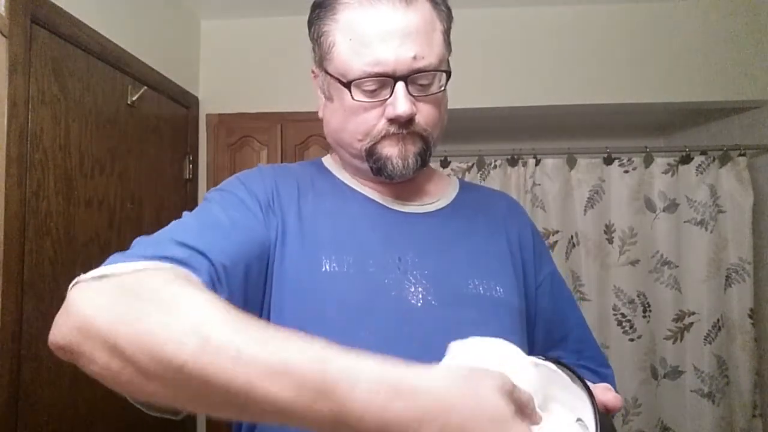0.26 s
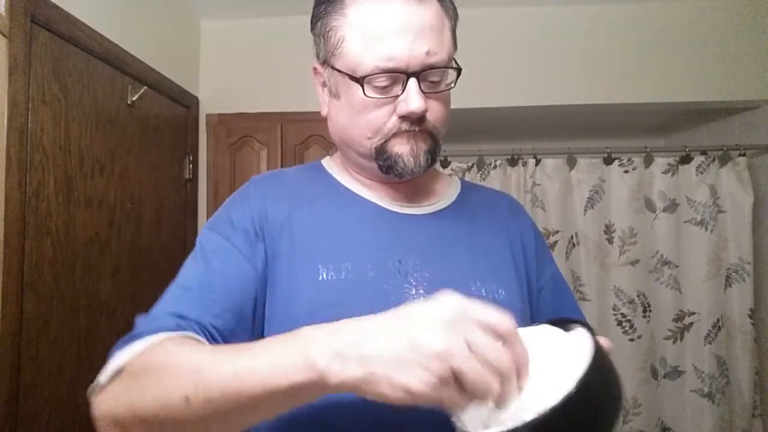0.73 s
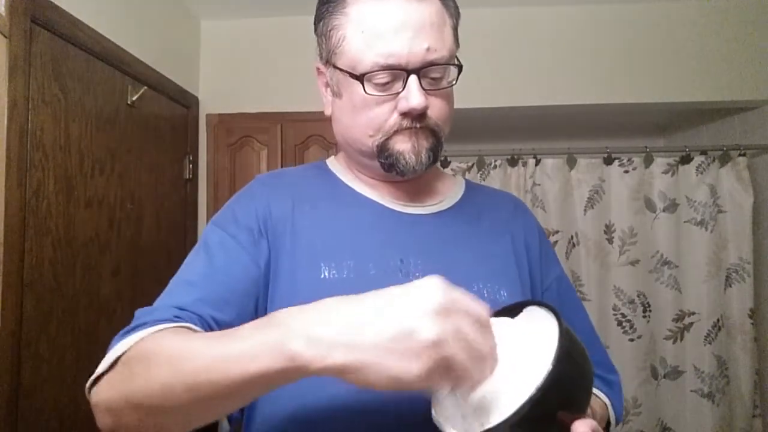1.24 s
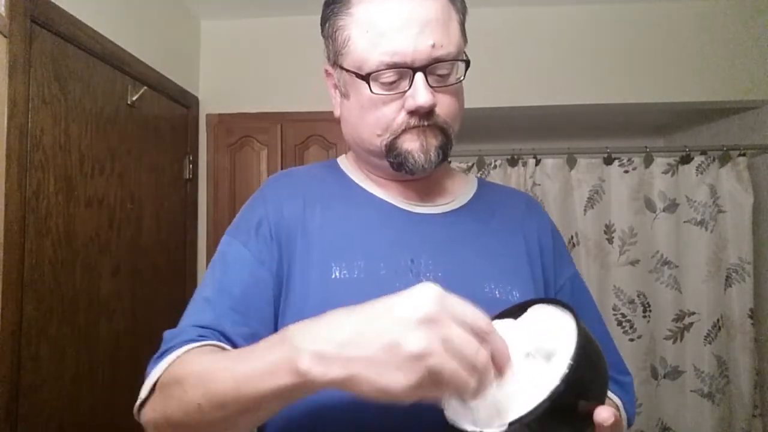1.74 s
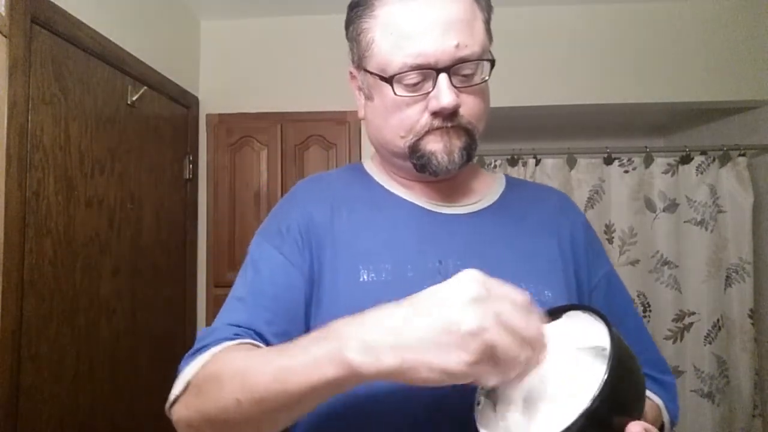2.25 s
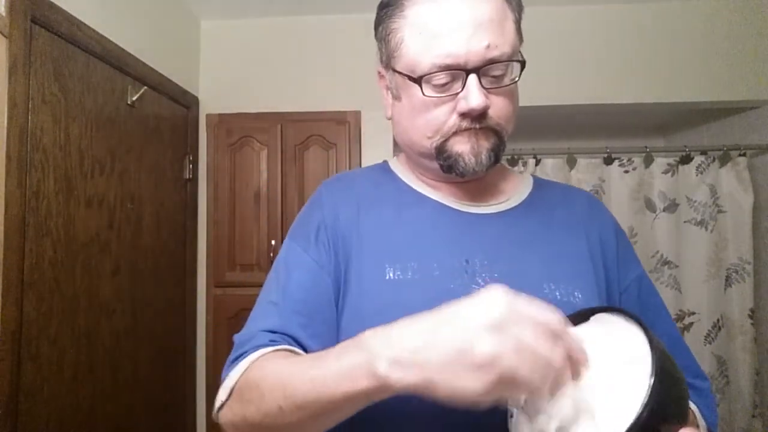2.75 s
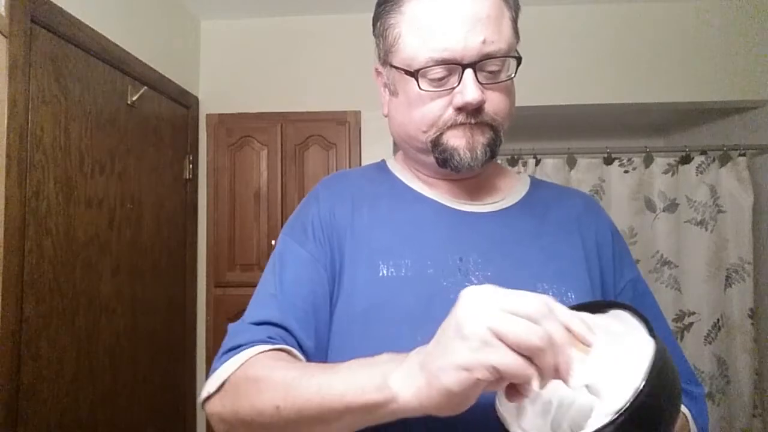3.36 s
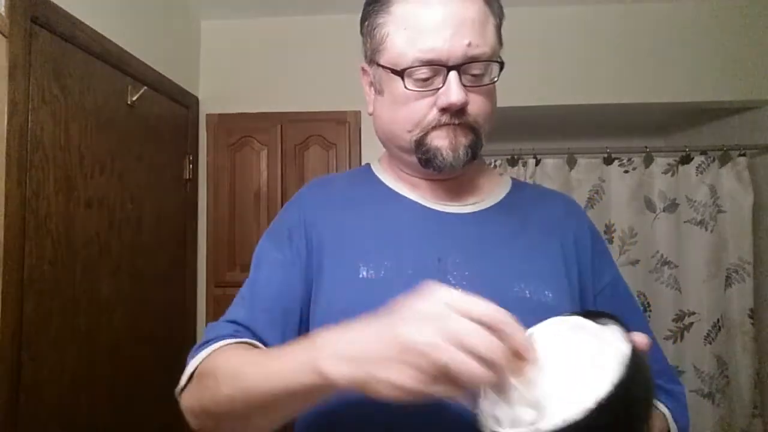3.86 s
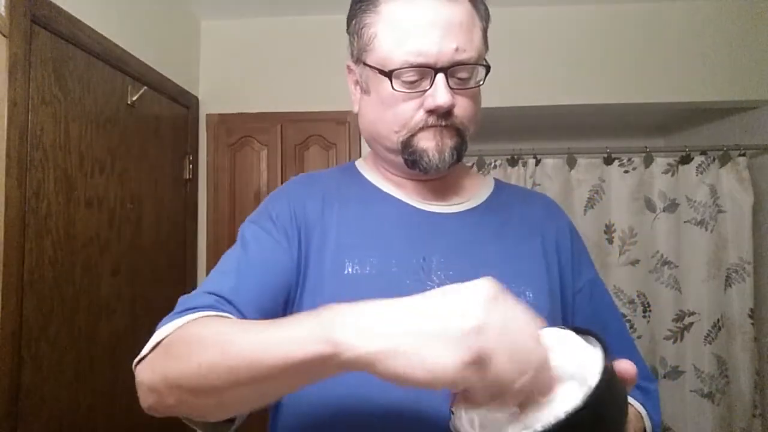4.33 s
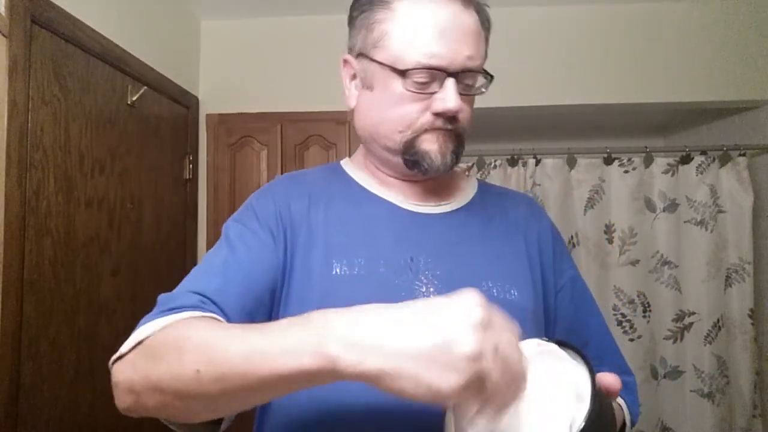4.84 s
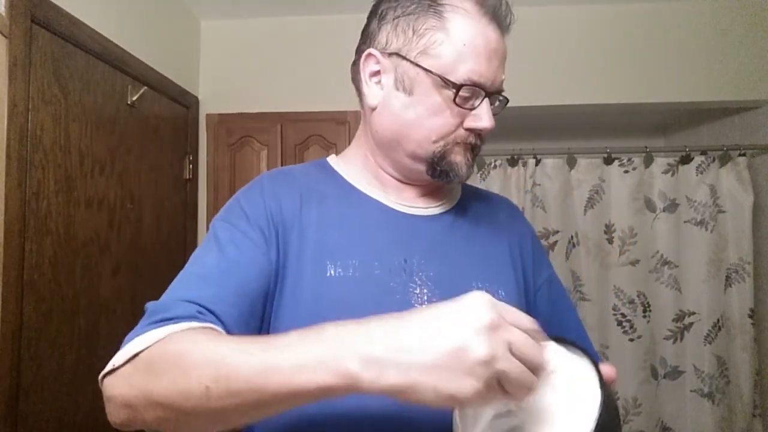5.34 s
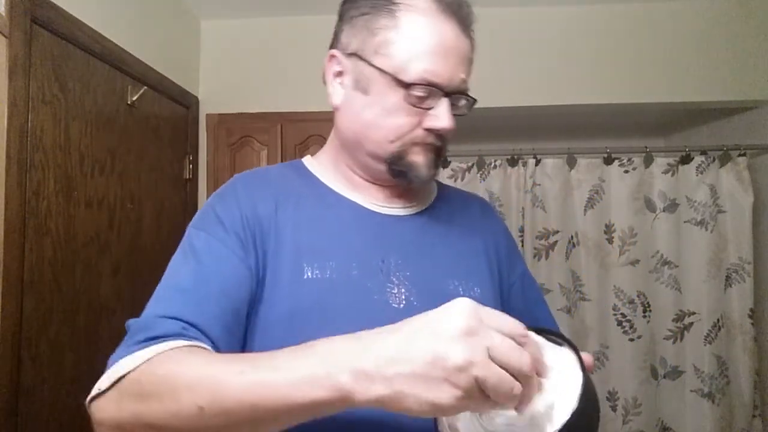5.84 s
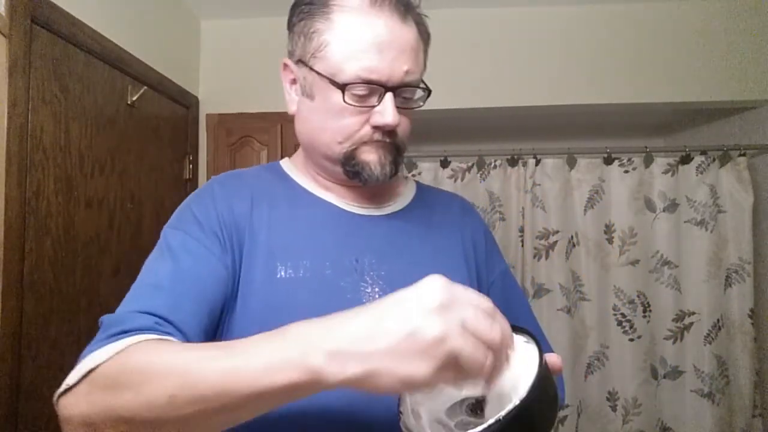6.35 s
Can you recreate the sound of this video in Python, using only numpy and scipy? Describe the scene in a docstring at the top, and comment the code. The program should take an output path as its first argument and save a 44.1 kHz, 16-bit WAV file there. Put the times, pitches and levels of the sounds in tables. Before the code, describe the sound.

A shaving brush kneads wet lather in a hand-held bowl, heard close in a small reflective bathroom. At 0 s soft squelching and faint crackle are under way, fading almost to nothing by 0.5 s. At about 0.65 s the brush returns with a dull bump and loud hollow plops, clustered until 1.25 s. Gentler whisking follows, with a wet burst of plops and crackle around 2.0-2.3 s, then easy strokes and a faint knock at 2.9 s. From 3.2 s it dies away; one small ringing plop sounds at 3.5 s in near quiet. Around 4.0-4.15 s squelching resumes with a light bump, growing busier, with a ringing plop at 5.1 s. From 5.3 to 6.6 s the strokes are strongest, thick with snaps, bubbles and a bump near 6.0 s. Dull rubbing, low hum, faint airy hiss and tiny very high whistles lie beneath.

```python
"""In a small live bathroom, a shaving brush whisks wet lather in a hand-held bowl.
Random bursts of bubbles make squelch and crackle; a faint, very high hiss of shaped noise comes and goes.
Pockets of air plop open as short rings with a snap and spray; wet bristles add faint gliding whistles.
Twice the whisking dies away and returns, as the brush is lifted and pushed back in.
Now and then the brush bumps the bowl; dull rubbing and a low room hum lie under it all."""
import sys
import numpy as np
from scipy import signal
from scipy.fft import rfft, irfft, next_fast_len
from scipy.io import wavfile
from scipy.ndimage import map_coordinates

SR = 44100
rng = np.random.default_rng(int(sys.argv[2]) if len(sys.argv) > 2 else 0)


def int16_out(signal):
    """Quantize to a 16-bit WAV file."""
    q = np.round(np.clip(np.atleast_2d(signal).T, -1, 1) * 32767)
    wavfile.write(sys.argv[1], SR, q.astype(np.int16))


N = 290619  # length in samples

# how hard the brush is worked: start_s [s], effort_db [dB]
EFFORT = [(0.0, -53.5), (0.37, -78), (0.64, -92.5), (0.84, -57.5), (1.56, -62), (1.82, -63.5), (2.13, -58),
          (2.81, -57), (2.99, -63), (3.27, -75), (3.98, -87), (4.13, -57), (4.66, -54.5), (5.12, -58.5),
          (5.51, -49), (6.06, -56), (6.18, -50), (6.59, -52)]
EASY_DB = -56.5  # the effort of easy, even whisking


def lather():
    """The brush kneads the foam: big bubbles squelch and small ones crackle, both in the same clumps."""
    # tone of the big and of the small bubbles: pitch_hz [Hz], level_db [relative dB]
    squelch_spectrum = [(88, -35), (150, -10), (210, -13), (308, -2.5), (482, -10.5), (550, -8),
                        (627, -3.5), (663, -4), (830, -9.5), (972, -5.5), (1040, -4.5), (1320, -20.5),
                        (1400, -8.5), (1820, -38), (3080, -120)]
    crackle_spectrum = [(530, -37.5), (900, -6), (1070, -5.5), (1320, -5), (1460, -7), (1710, -7),
                        (2320, -23), (2970, -23.5), (3720, -23.5), (4230, -32), (6160, -31.5), (7280, -35),
                        (8520, -50.5), (9500, -67.5), (12400, -95), (20900, -120)]
    squelch_easy_db, crackle_easy_db = -59, -65  # at easy effort, before clumping and echo
    squelch_grows, crackle_grows = 0.92, 1.23  # dB gained per dB of effort

    effort_db = effort_above_easy()
    swept_squelch, swept_crackle = sweeps()
    # steady whisking and firm sweeps add as powers
    squelch_gain = np.hypot(amp(squelch_easy_db + squelch_grows * effort_db), swept_squelch)
    crackle_gain = np.hypot(amp(crackle_easy_db + crackle_grows * effort_db), swept_crackle)

    clumps = np.tanh(wobble(70))  # between -1 and 1
    squelch_gain = squelch_gain * amp(4.3 * clumps - 3.0)
    crackle_gain = crackle_gain * amp(6.07 * clumps - 3.5)

    big = bubbles(rate=700, low_hz=200.0, high_hz=1440, cycles=3.8, spread_db=16)
    small = bubbles(rate=2600, low_hz=855, high_hz=7900, cycles=4.5, spread_db=13.0)
    squelch = foam(big, squelch_gain, squelch_spectrum, wet_db=-0.5)
    crackle = foam(small, crackle_gain, crackle_spectrum, wet_db=-1.5)
    return squelch + crackle


def effort_above_easy():
    """Brush effort over time, in dB above easy whisking."""
    return curves(EFFORT)[0] - EASY_DB


def sweeps():
    """Firm sweeps through the foam: each bites, eases off and lets go, giving squelch and crackle gains."""
    # levels at the bite, before clumping and echo:
    # start_s [s], length_s [s], squelch_db [dB], crackle_db [dB]
    sweep_table = [(-0.02, 0.12, -54.5, -76), (0.623, 0.013, -65, -59.5), (0.641, 0.17, -44.5, -60),
                   (1.103, 0.047, -60, -55.5), (1.816, 0.22, -55.5, -67), (1.988, 0.17, -49, -60),
                   (2.127, 0.053, -43, -54.5), (2.259, 0.13, -52.5, -56.5), (2.482, 0.15, -53.5, -59),
                   (2.622, 0.18, -54, -60), (2.997, 0.18, -58, -71.5), (3.939, 0.21, -55, -64),
                   (4.133, 0.05, -43, -54), (4.272, 0.091, -54.5, -69), (4.685, 0.086, -51, -55.5),
                   (4.804, .1, -71, -57), (5.303, 0.063, -50, -52.5), (5.43, 0.26, -61, -59.5),
                   (5.615, 0.065, -54, -61), (5.718, .06, -51.5, -65), (5.796, 0.063, -51.5, -65),
                   (6.01, 0.15, -45.5, -52), (6.257, 0.092, -40, -44), (6.51, 0.074, -47.5, -51),
                   (6.577, .03, -48, -45)]
    attack_s, sag_db, release_db_per_s = 0.0061, 5.5, 349
    gains, t = np.zeros((2, N)), np.arange(N) / SR
    for start_s, length_s, squelch_db, crackle_db in sweep_table:
        age = np.maximum(t - start_s, 0)
        bite = np.minimum(age / attack_s, 1)
        sag = sag_db * np.minimum(age / length_s, 1)
        release = release_db_per_s * np.maximum(age - length_s, 0)
        gains += amp([[squelch_db], [crackle_db]]) * bite * amp(-(sag + release))
    return gains


def bubbles(rate, low_hz, high_hz, cycles, spread_db):
    """Bubbles burst at random (rate a second), each ringing for a few cycles; most are faint. Rms 1."""
    when, pitch, size, phase = rng.random((int(rate * N / SR), 4)).T[:, :, None]
    hz = low_hz + (high_hz - low_hz) * pitch
    k = np.arange(int(cycles * SR / low_hz))  # samples since the burst
    age = hz * k / SR  # in cycles
    envelope = (1 - np.exp(-4 * age)) * amp(-50 * age / cycles)
    ring = np.sin(2 * np.pi * (age + phase)) * envelope
    loudness = np.sqrt(hz) * amp(spread_db * size ** 4)  # the root evens out energy across pitches
    grains = loudness * ring
    position = k + (when * N).astype(int)
    return unit(np.bincount(position.ravel(), grains.ravel(), N)[:N])


def foam(grains, gain, spectrum, wet_db):
    """Bubble grains coloured by the foam, played at a gain and heard in the room."""
    voiced = unit(coloured(grains[None], spectrum)[0])
    return bathroom(voiced * gain, wet_db, ring_db=-11.5)


def plops():
    """A film snaps and sprays; a moment later its air pocket rings and the shifted foam gives a low push."""
    # air pockets opening, levels before the boosts below and the filters:
    # start_s [s], cavity_db [dB], pitch_hz [Hz, where the ring settles],
    # push_db [dB], snap_db [dB], spray_db [dB]
    plop_table = [(0.116, -48, 547, -48, -68, -62), (0.266, -49, 526, -72, -65, -67.5),
                  (0.744, -26, 615, -51, -36.5, -57), (0.802, -32.5, 500, -48, -48.5, -65.5),
                  (0.933, -50, 635, -57, -58, -67.5), (0.997, -33, 663, -51.5, -48.5, -70),
                  (1.032, -32, 735, -47.5, -45, -67.5), (1.112, -44, 705, -55.5, -53, -78),
                  (1.242, -40.5, 563, -54.5, -52, -80), (2.01, -39, 810, -56.5, -64, -60.5),
                  (2.038, -37, 616, -59.5, -52, -60), (2.108, -31, 626, -51.5, -45, -70),
                  (2.139, -48, 716, -43, -50, -67), (2.158, -31.5, 614, -39.5, -34, -49.5),
                  (2.275, -45, 970, -57, -44.5, -73), (2.514, -45, 1000, -54, -53, -77),
                  (3.943, -53.5, 676, -56, -58.5, -78), (4.125, -41.5, 670, -53.5, -59, -71.5),
                  (4.137, -36, 640, -41.5, -47.5, -73), (4.56, -39.5, 605, -62, -47, -63),
                  (4.709, -39, 624, -56, -59, -58), (4.727, -35, 570, -48, -44.5, -55.5),
                  (4.81, -39.5, 680, -56, -58, -70), (4.9, -42, 633, -50.5, -50, -57),
                  (5.297, -43.5, 695, -61, -50.5, -60), (5.42, -43.5, 680, -58, -45.5, -73),
                  (5.463, -36, 654, -56, -49, -61.5), (5.633, -49, 388, -49.5, -46, -55),
                  (5.725, -47, 636, -49, -67, -79), (5.765, -36.5, 604, -53, -47, -58.5),
                  (5.98, -36, 645, -47.5, -50, -60), (6.038, -37, 530, -39, -39, -51.5),
                  (6.062, -47, 388, -53.5, -45, -78), (6.111, -42, 616, -45.5, -37, -59),
                  (6.13, -34, 650, -35, -57, -53.5), (6.257, -30, 638, -47, -43.5, -64),
                  (6.305, -24.5, 632, -46, -39, -50), (6.424, -33.5, 643, -57.5, -49, -65)]
    cavity_boost_db, push_boost_db, snap_boost_db, spray_boost_db = 7.5, 8, 13, 9.5
    out, t = np.zeros((3, N + SR)), np.arange(SR // 10) / SR
    torn = np.maximum(t - .0005, 0)  # seconds since the film tore
    opened = np.maximum(t - .0012, 0)  # seconds since the pocket opened
    for start_s, cavity_db, pitch_hz, push_db, snap_db, spray_db in plop_table:
        push_size, snap_size = 1 + .12 * rng.uniform(-1.44, 1, 2)  # random shifts of pitch
        cavity = damped(opened, pitch_hz, t60=0.014, attack=0.002, bend=0.36)
        cavity = amp(cavity_db + cavity_boost_db) * cavity
        push = damped(opened, 300 * push_size, t60=0.024, attack=0.0016)
        push = amp(push_db + push_boost_db) * push
        snap = damped(torn, 1330 * snap_size, t60=0.0071, attack=0.0019, bend=0.63)
        snap = amp(snap_db + snap_boost_db) * snap
        puff = amp(-60 * torn / 0.027) * (1 - np.exp(-torn / 0.00069))
        spray = amp(spray_db + spray_boost_db) * puff * rng.standard_normal(len(t))
        out[:, round(start_s * SR):][:, :len(t)] += np.array([cavity + push, snap, spray])
    # filter points: (Hz, dB)
    body = coloured(out[:1], [(60, 0.5), (200, -7.5), (900, 5), (1500, 10), (3000, -19.0), (8000, -40.5)])
    film = coloured(out[1:2], [(300, -6.5), (1000, 19.0), (1900, 7.0), (2400, -2.0), (8000, -16.0)])
    mist = coloured(out[2:], [(1000, -6), (2200, 5.5), (3700, 4.0), (4600, -7.0), (7200, -13.0),
                              (9000, -33.0), (15000, -21)])
    return bathroom((body + film + mist)[0], wet_db=-2.5, ring_db=-8)


def ringing_plops():
    """Two plops that ring on in the room: a small burst of noise and one short ring."""
    # level before echo: start_s [s], level_db [dB], pitch_hz [Hz]
    ringing_table = [(3.520, -44, 730), (5.133, -36.5, 797)]
    ring_t60_s, burst_t60_s = 0.041, .014
    burst_db = -4  # relative to the ring, before the burst's filter
    out, t = np.zeros((2, N + SR)), np.arange(SR // 4) / SR
    for start_s, level_db, pitch_hz in ringing_table:
        ring = damped(t, pitch_hz, ring_t60_s, attack=0.0022)
        burst = amp(burst_db - 60 * t / burst_t60_s) * rng.standard_normal(len(t))
        out[:, round(start_s * SR):][:, :len(t)] += amp(level_db) * np.array([ring, burst])
    bursts = coloured(out[1:], [(300, 1.5), (850, 20), (1400, 8.5), (2200, -10.5), (4000, -16), (9000, -41)])
    return bathroom(out[0, :N] + bursts[0], wet_db=4, ring_db=-12)


def knocks():
    """The loaded brush softly bumps the bowl: the hand-damped bowl thuds briefly and the lather slaps."""
    # bumps, levels before the filters: start_s [s], level_db [dB], slap_db [dB relative to the bump]
    knock_table = [(0.644, -15, -21.5), (0.699, -28.5, -30), (.996, -32.5, -25.5), (1.031, -30.5, -24),
                   (2.896, -37, -16.5), (4.161, -38.5, -14.5), (6.037, -27.5, -21)]
    # tones of the damped bowl: pitch_hz [Hz], level_db [dB before a small random change],
    # t60_s [s to fall by 60 dB]
    thud_tones = [(155.6, -25.5, 0.062), (258, -3, 0.014), (336, 0.5, 0.015), (478, -0.5, 0.016),
                  (669, -6, 0.02), (1370, -9, 0.0022)]
    out, t = np.zeros((2, N + SR)), np.arange(SR // 10) / SR
    for start_s, level_db, slap_db in knock_table:
        thud = np.zeros(len(t))
        for k, (pitch_hz, tone_db, t60_s) in enumerate(thud_tones):
            sign = (-1) ** k  # neighbouring tones start in opposite directions
            tone_gain = amp(tone_db + rng.normal(0, 1))
            thud += sign * tone_gain * damped(t, pitch_hz, t60_s, attack=0.00018)
        slap = amp(slap_db - 60 * t / 0.022) * rng.standard_normal(len(t))
        out[:, round(start_s * SR):][:, :len(t)] += amp(level_db) * np.array([thud, slap])
    body = coloured(out[:1], [(700, 2), (1500, 2), (4000, -12.5)])
    wet = coloured(out[1:], [(300, 5.5), (1700, 9), (2600, -9.5), (7000, -23.0), (9000, -32.5)])
    return bathroom((body + wet)[0], wet_db=-1, ring_db=-10.5)


def whistles():
    """Wet bristles whistle faintly and unsteadily, very high up: each tone swells, glides and fades."""
    # start_s [s], length_s [s], first_hz [Hz], last_hz [Hz], level_db [dB at the middle, before echo]
    whistle_table = [(-.5, 1.05, 13100, 12130, -83), (0.621, 0.52, 12260, 12060, -80),
                     (2.792, .07, 13300, 13200, -85), (3.0, .1, 13850, 13900, -85),
                     (3.01, .1, 15500, 15800, -87), (5.627, .1, 13800, 14200, -74),
                     (5.806, .12, 13200, 13450, -74), (5.781, .08, 15100, 15420, -77),
                     (5.862, 0.18, 14400, 14300, -84)]
    waver_hz, flutter_hz = 60, 150  # size of the slow and the fast random drift in pitch
    out, t = np.zeros(N), np.arange(N) / SR
    for start_s, length_s, first_hz, last_hz, level_db in whistle_table:
        progress = np.clip((t - start_s) / length_s, 0, 1)
        glide = first_hz + (last_hz - first_hz) * progress
        hz = glide + waver_hz * wobble(27) + flutter_hz * wobble(400)
        tone = np.sin(2 * np.pi * np.cumsum(hz) / SR)
        out += amp(level_db) * np.sin(np.pi * progress) * tone
    return bathroom(out, wet_db=-2.0, ring_db=10.5)


def high_hiss():
    """A faint, very high hiss that comes and goes: shaped noise under a level curve."""
    # pitch_hz [Hz], level_db [relative dB]
    hiss_spectrum = [(5880, -52.5), (10000, -21), (10900, -17), (11700, 5), (12100, 2), (15100, 10),
                     (15700, -6)]
    # level before a small random wobble: start_s [s], level_db [dB]
    hiss_levels = [(0.0, -80), (0.42, -104), (0.83, -89), (1.74, -101), (2.15, -84.5), (3.01, -89),
                   (3.06, -90), (3.27, -101), (3.93, -102), (4.13, -89), (5.25, -88.5), (5.87, -76),
                   (6.2, -82), (6.59, -81.5)]
    hiss_db, = curves(hiss_levels)
    return amp(hiss_db + 1.3 * wobble(29)) * noise(hiss_spectrum)


def background():
    """Dull rubbing of the held bowl, which follows the effort, over the room's steady hum and hiss."""
    # tone of the rubbing and of the quiet room: pitch_hz [Hz], level_db [relative dB]
    rub_spectrum = [(25, -26), (45, -5), (64, 5.5), (85, -3), (118, 2.5), (137, -11.5), (158, 1.5),
                    (173, -7), (188, -5.5), (215, -7), (300, -22), (600, -83.5)]
    quiet_spectrum = [(12, -28), (20, 3.5), (32, -20), (81, -6), (113, -4), (133, -17), (191, -14),
                      (299, -10.5), (454, -25), (618, -21), (2050, -39.5), (6990, -43), (12200, -41.5),
                      (15700, -43)]
    rub_easy_db, rub_grows = -69, 0.4  # level at easy effort; dB gained per dB of effort
    tilt_s, tilt_length_s, tilt_db = 1.62, 1.12, -62.5  # the hand rubs more while it tilts the bowl
    progress = np.clip((np.arange(N) / SR - tilt_s) / tilt_length_s, 0, 1)
    tilting = np.sin(np.pi * progress)
    rub_gain = np.hypot(amp(rub_easy_db + rub_grows * effort_above_easy()), amp(tilt_db) * tilting)
    return rub_gain * noise(rub_spectrum) + amp(-75.5) * noise(quiet_spectrum)


def bathroom(x, wet_db, ring_db):
    """Direct sound plus the walls' echo, redrawn every fifth of a second as the bowl moves."""
    # ring of bowl and room: pitch_hz [Hz], width_hz [Hz], level_db [dB before ring_db is added]
    bowl_rings = [(318, 11, -12), (396, 54, 7.5), (522, 130, 1), (625, 42, -5.5), (646, 6.5, -4.5),
                  (747, 34, 7), (924, 22, -4), (1460, 88, -12.5), (1680, 170, -8)]
    # how long echoes last: pitch_hz [Hz], t60_s [s to fall by 60 dB]
    room_decay = [(150, 0.47), (400, 0.45), (1000, 0.19), (2800, 0.36), (8000, 0.5)]
    hop = SR // 5
    echo = np.zeros((2, N + 2 * SR))
    padded = np.pad(x, (hop, 2 * hop))
    fade = np.sin(np.pi * np.arange(2 * hop) / (2 * hop))  # echoes blend into each other at equal power
    for start in range(0, N + hop, hop):
        # a tail of noise whose fading depends on pitch
        hz, t, z = signal.stft(rng.standard_normal((2, SR // 2)), SR, nperseg=256)
        decay = amp(-60 * t / along(room_decay, hz)[:, None])
        build_up = 1 - np.exp(-t / 0.0017)
        tail = signal.istft(z * decay * build_up, SR, nperseg=256)[1]
        tail = tail / np.linalg.norm(tail[0])
        piece = fade * padded[None, start:start + 2 * hop]
        answer = signal.fftconvolve(piece, tail, axes=1)
        echo[:, start:start + answer.shape[1]] += answer

    def ring(f):
        """Flat response plus a peak at each ringing pitch."""
        peaks = sum(amp(db) * 1j * f * w / (c * c - f * f + 1j * f * w) for c, w, db in bowl_rings)
        return 1 + amp(ring_db) * peaks

    return x + amp(wet_db) * diffuse(filtered(echo[:, hop:hop + N], ring))


def damped(t, hz, t60, attack, bend=0):
    """A dying ring; with a bend its pitch starts higher by about 2.7 times that share, then settles."""
    phase = hz * (t + bend * 0.0015 * (1 - np.exp(-t / 0.00055)))
    return np.sin(2 * np.pi * phase) * amp(-60 * t / t60) * (1 - np.exp(-t / attack))


def noise(spectrum):
    """Stereo noise with the given spectrum, spread around the listener, of rms 1."""
    return unit(coloured(diffuse(rng.standard_normal((2, N))), spectrum))


def diffuse(pair):
    """Mix two unrelated signals as a sound field at two microphones: alike low down, unlike high up."""
    # pitch_hz [Hz], likeness of left and right [0 unrelated to 1 identical]
    likeness = [(60, .85), (300, .92), (600, .86), (1000, .55), (1600, .25), (3000, .05), (10000, .03)]

    def mix(hz):
        """Shares of the common and the opposing signal at each frequency."""
        turn = np.arccos(np.clip(along(likeness, hz), -1, 1)) / 2
        return np.array([np.cos(turn), np.sin(turn)])

    mid, side = filtered(pair, mix)
    return np.array([mid + side, mid - side])


def coloured(x, spectrum):
    """Filter x with the given (Hz, dB) curve, responding only after each sound arrives (minimum phase)."""
    size = 8192
    gain = amp(along(spectrum, np.fft.rfftfreq(size, 1 / SR)))
    cepstrum = irfft(np.log(gain + 1e-6))
    # folding the cepstrum onto positive times makes the filter causal
    cepstrum[1:size // 2] *= 2
    cepstrum[size // 2 + 1:] = 0
    impulse = irfft(np.exp(rfft(cepstrum)))
    return signal.fftconvolve(x, impulse[None], axes=1)[:, :N]


def filtered(x, response):
    """Multiply the spectrum of x by a response, which is a function of frequency."""
    m = next_fast_len(N + SR)
    return irfft(rfft(x, m) * response(np.fft.rfftfreq(m, 1 / SR)), m)[..., :N]


def wobble(rate):
    """A smooth random curve through rate random points a second."""
    points = rng.standard_normal(int(N * rate / SR) + 4)
    return map_coordinates(points, [np.arange(N) * rate / SR])


def curves(rows):
    """One value per sample for each column after the time."""
    s, *cols = np.transpose(rows)
    return [np.interp(np.arange(N) / SR, s, c) for c in cols]


def along(points, hz):
    """Read (Hz, value) points at any frequency, in between on a log axis."""
    f, v = np.transpose(points)
    return np.interp(np.log(hz + 1), np.log(f + 1), v)


def unit(x):
    """Scale to rms 1."""
    return x / np.sqrt(np.mean(x ** 2) + 1e-20)


def amp(db):
    """Turn decibels into gain."""
    return 10 ** (np.asarray(db) / 20)


def scene():
    """Everything, with the balance and phase that the bowl's place gives each frequency."""
    # balance: pitch_hz [Hz], left minus right [dB]
    balance = [(60, 10), (110, 22), (200, -0.5), (380, -0.5), (700, 1), (1290, -6), (2380, 5), (4400, -1.5),
               (8120, -6), (15000, 5)]
    # phase between the microphone ports: pitch_hz [Hz], left leads by [radians]
    port_phase = [(780, 0.5), (1050, -2.5), (1330, -1.5), (1720, -6.5), (2100, -5), (3800, -5)]
    brush = lather() + plops() + ringing_plops() + knocks() + high_hiss()
    sides = np.array([[.5], [-.5]])  # half the difference goes to each side

    def place(hz):
        """Gain and phase of the left and right sides."""
        return amp(sides * along(balance, hz)) * np.exp(1j * sides * along(port_phase, hz))

    return filtered(brush, place) + whistles() + background()


def record(dry):
    """A sharp band limit: nothing passes from 15750 Hz up."""
    return filtered(dry, lambda hz: hz < 15750)


dry = scene()
out = record(dry)
int16_out(out)
```